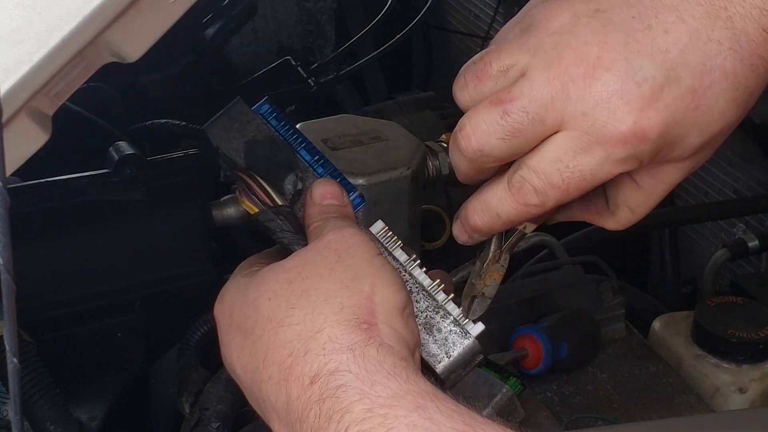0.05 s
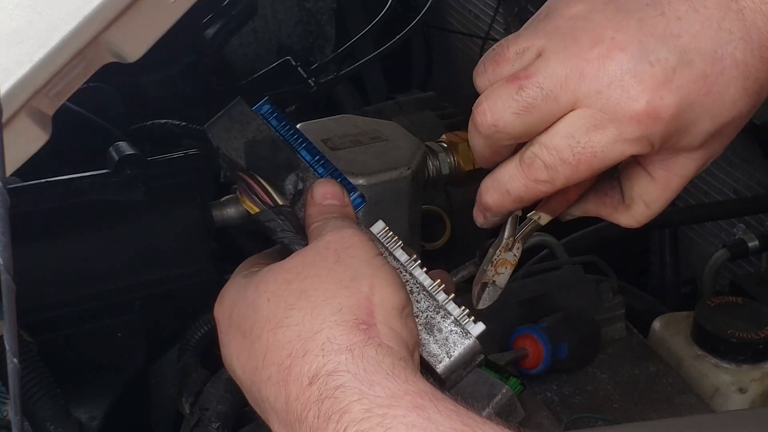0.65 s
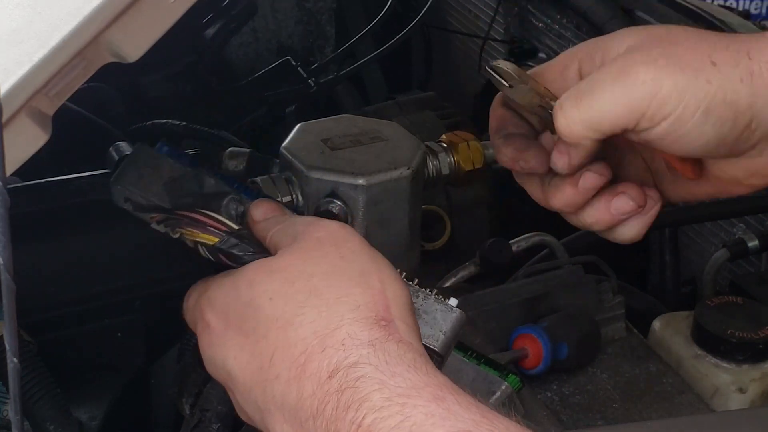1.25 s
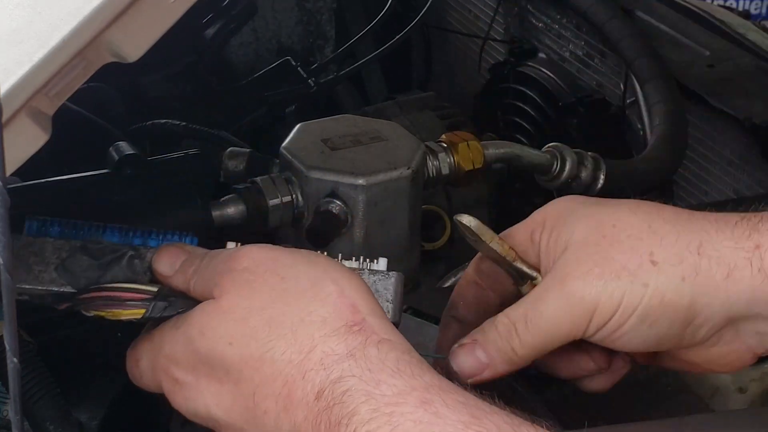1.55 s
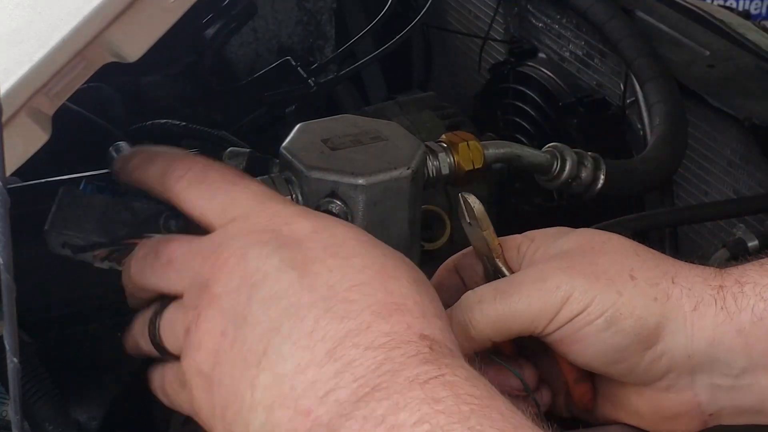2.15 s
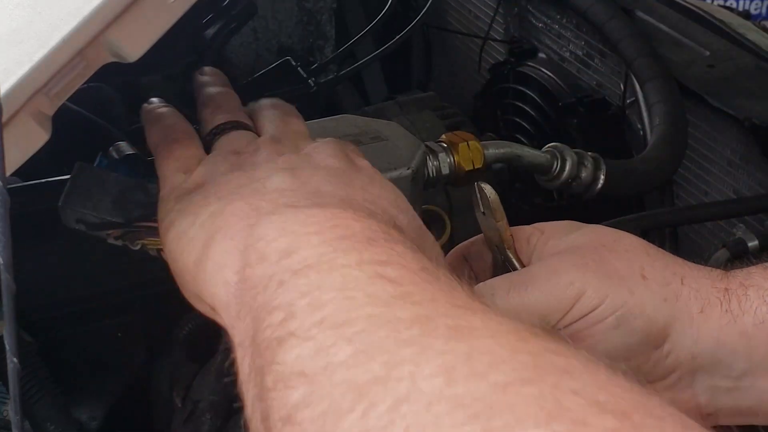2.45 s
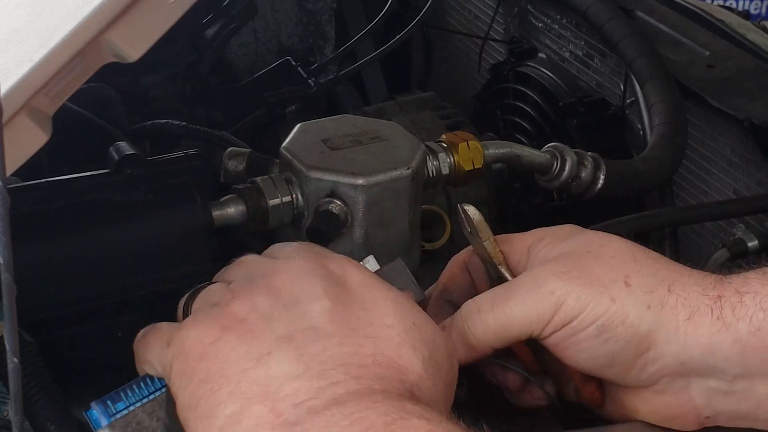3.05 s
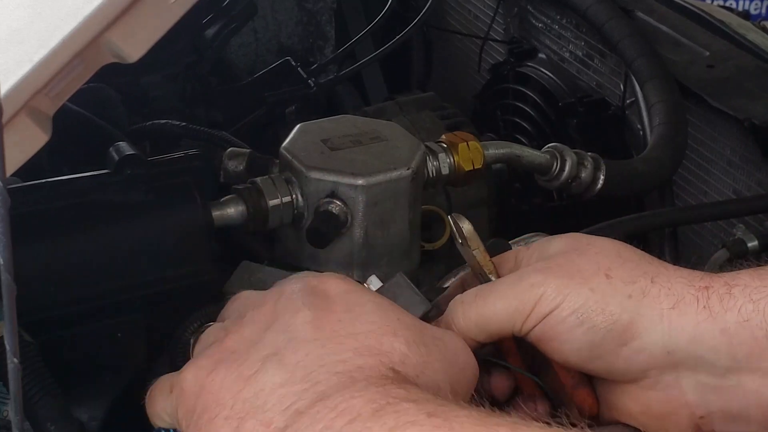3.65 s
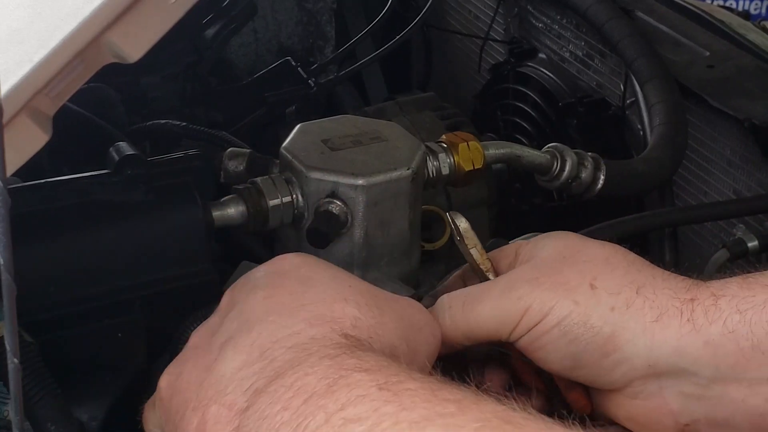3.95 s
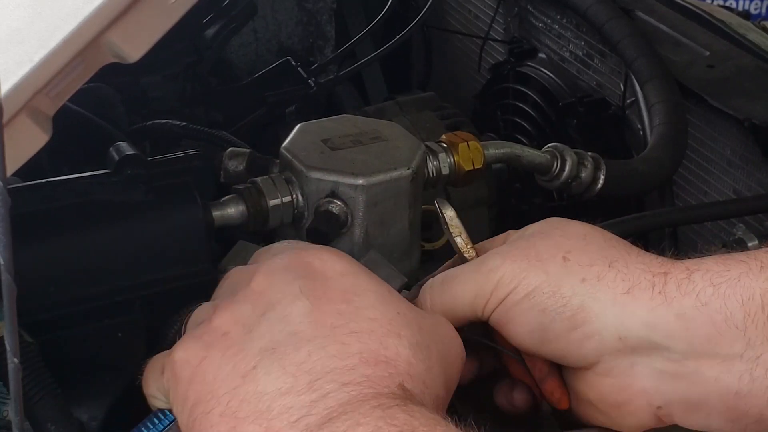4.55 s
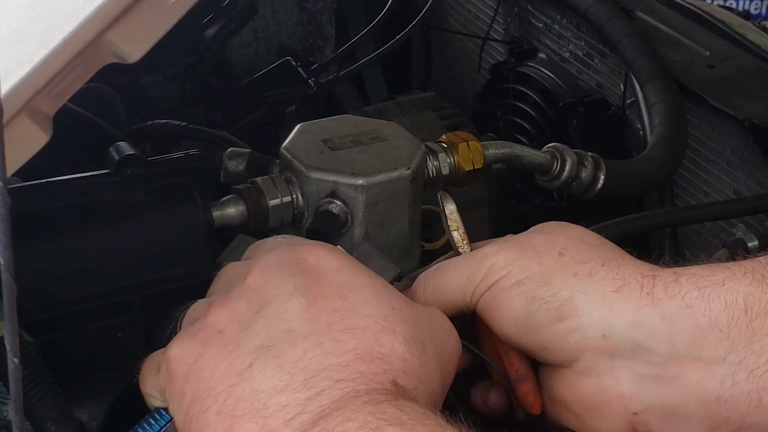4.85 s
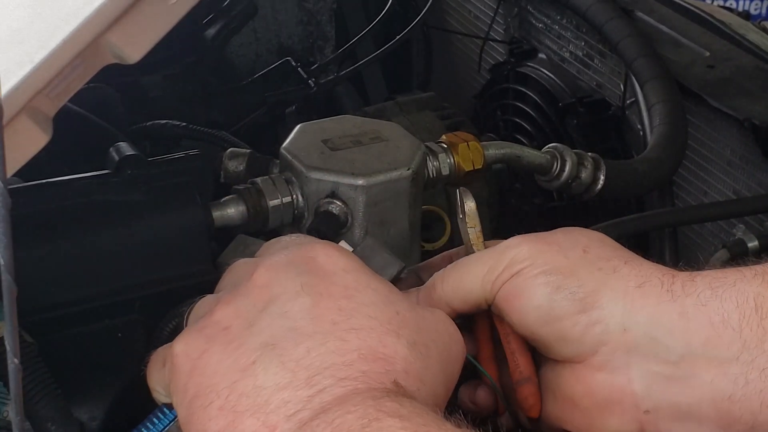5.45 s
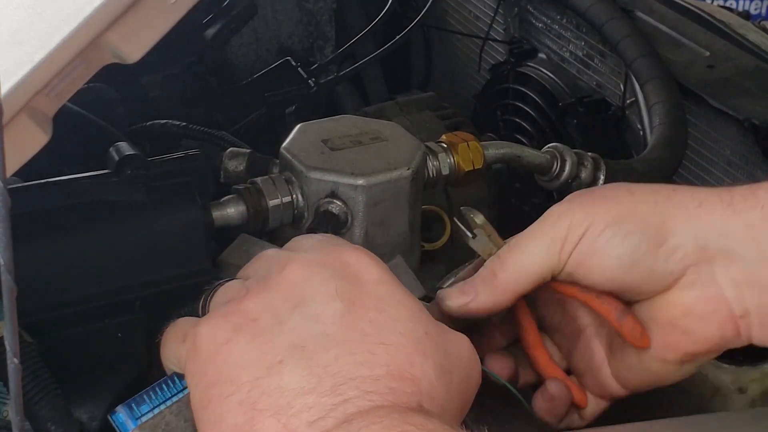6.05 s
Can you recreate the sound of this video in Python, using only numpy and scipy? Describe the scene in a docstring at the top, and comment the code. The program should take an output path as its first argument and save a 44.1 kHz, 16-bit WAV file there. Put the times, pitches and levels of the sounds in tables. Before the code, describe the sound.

In a quiet garage, a deep, steady drone builds while someone works a plastic connector into place with pliers. The steel tips tick and scrape lightly, the plastic shell clacks, and a bundle of wires bumps dully on a body panel. Low puffs of air buffet the nearby microphone, louder than the work itself. The clicks thin out, then return in a quick final cluster, mostly on the left.

```python
"""Pliers work a plastic wiring connector into place in a car's engine bay.
Their metal tips tick, ping and scrape, the plastic shell cracks and rings, and the bundle of wires
knocks against hollow bodywork. Faint squeaks, dull pops and a thin gliding hiss come in between.
A low drone swells in the garage, while a draught and sweeps of the arm push air at the microphone."""
import sys
import numpy as np
from scipy import signal
from scipy.fft import rfft, irfft, next_fast_len
from scipy.io import wavfile
from scipy.ndimage import uniform_filter1d

SR = 44100
rng = np.random.default_rng(int(sys.argv[2]) if len(sys.argv) > 2 else 0)


def to_wav(s):
    """Save 16-bit WAV."""
    ch = np.atleast_2d(s).T  # columns
    pcm = np.round(np.clip(ch, -1, 1) * 32767)  # PCM
    wavfile.write(sys.argv[1], SR, pcm.astype(np.int16))


N = 277389
TIME = np.arange(N) / SR
HIT_TIME = np.arange(SR // 2) / SR  # seconds since one hit began

# In all tables, ring_s is the time to fade by 60 dB and fall_s the time to drop to about a third.
# lean_db is how much louder the left side is than the right. A likeness of 1 means both sides match.

# tone of the garage's background noise: frequency_hz, level_db
ROOM_TONE = [(71, -32.5), (120, -1), (326, -13.5), (400, -12), (471, -20), (724, -21.5), (802, -22.5),
             (1160, -24.5), (1310, -23.5), (1540, -23), (1710, -25), (3080, -28), (7420, -39.5),
             (13100, -24.5), (15800, -26)]
# how alike that noise is on both sides: frequency_hz, likeness
ROOM_LIKENESS = [(130, 0.61), (300, 0.55), (640, 0), (1400, 0), (4000, 0.011)]
# how far it leans left: frequency_hz, lean_db
ROOM_BALANCE = [(100, 6.5), (300, 5.5), (2400, 3.5), (4400, 2.5), (15000, 0.7)]
# path of the low drone: time_s, pitch_hz, level_db
DRONE_PATH = [(0, 59.14, -70.5), (1.2, 59.9, -58), (1.5, 59.39, -42.5), (2.05, 57.5, -45.5),
              (2.5, 57.86, -40), (3.4, 60.15, -35.5), (5.3, 60.8, -34), (6.29, 62.8, -34.5)]
# tone of the rumble that goes with it: frequency_hz, level_db
RUMBLE_TONE = [(60, -0.5), (120, 4), (250, -2), (430, -16.5), (700, -33), (2000, -48.5)]
# draught on the microphone, stronger once the arm is close: time_s, level_db
DRAUGHT_LEVELS = [(0, -57.5), (1.1, -59.5), (1.5, -51.5), (3.3, -44.5), (6.29, -49.5)]
# arm sweeps that push air: peak_s, level_db, fall_s
ARM_SWEEPS = [(1.63, -39.5, .08), (1.8, -41, 0.045), (2.17, -31, 0.072), (2.48, -33, 0.056),
              (2.89, -36, 0.067), (3.04, -34, .07), (3.6, -45.5, 0.14), (4.14, -26, .055),
              (4.35, -28.5, 0.18), (4.85, -38.5, .12), (5.35, -33, 0.057), (5.49, -35.5, 0.075)]
# tone of gently swirling air: frequency_hz, level_db
SWIRL_TONE = [(10, -41), (25, -19), (45, 4.5), (70, 8.5), (110, 2), (170, -15.5), (260, -24), (450, -42),
              (1000, -62.5), (3000, -75)]
# higher tone of strongly churning air: frequency_hz, level_db
CHURN_TONE = [(50, -16.5), (140, 6), (220, -7.5), (400, -33.5), (900, -58), (3000, -72.5)]
# single puffs of air: peak_s, level_db, pitch_hz, lean_db
AIR_PUFFS = [(2.446, -13, 117, 43.5), (2.18, -19, 72, 24), (4.115, -15, 85.6, 44), (4.334, -28, 141, -7.5),
             (4.381, -19, 100, 42), (4.439, -19.5, 66.7, 0.5), (5.351, -26, 77.6, -6)]
# wires hitting the bodywork (harder hits reach higher): start_s, level_db, highest_hz, lowest_hz
WIRE_KNOCKS = [(0.461, -64, 472, 256), (1.331, -57.5, 284, 237), (1.857, -61.5, 320, 209),
               (1.974, -61.5, 350, 242), (2.332, -51, 418, 288), (2.680, -57.5, 295, 256),
               (2.734, -48, 397, 267), (2.762, -46.5, 1110, 230), (2.842, -52, 360, 260),
               (2.873, -43.5, 1260, 255), (2.88, -40.5, 754, 110), (2.99, -57.5, 774, 240),
               (3.182, -54, 430, 240), (3.334, -35, 2600, 233), (3.342, -41.5, 2700, 400),
               (3.346, -46.5, 920, 860), (3.674, -49.5, 421.6, 291), (3.714, -46.5, 292, 212),
               (4.162, -48.5, 1520, 500), (4.17, -47.5, 690, 520), (4.203, -59.5, 1290, 1150),
               (4.277, -43, 339, 139.6), (4.297, -54, 925, 430), (4.771, -46.5, 2107, 150),
               (4.776, -49, 676, 580), (5.583, -56, 340, 250), (6.026, -52, 457, 310),
               (6.140, -60, 450, 280)]
# notes of the body panel: pitch_hz, level_db, ring_s (before each hit stretches it)
PANEL_NOTES = [(235.9, 18, 0.2), (316, -9, 1), (406, -11.5, .15), (437, 2.5, .27), (522, -3.5, 0.031),
               (537, -4, 0.27), (593, -8, .2), (692, -7.5, 0.27), (715, -15.5, 0.068), (860, -8, 0.07),
               (914, -13.5, 0.074), (1050, -15.5, 0.13), (1040, -20.5, 0.087), (1248, -9, 0.17)]
# tone of the panel's crowded upper notes and the engine bay: frequency_hz, level_db
BAY_TONE = [(90, -17.5), (160, 9.5), (280, 8), (520, -3.5), (680, -9), (880, -7.5), (1500, -17.5),
            (2400, -18.5), (3000, -18.5), (3800, -31), (9000, -11.5), (16000, -36.5)]
# how long they last: frequency_hz, ring_s (before each hit stretches it)
BAY_RING_TIMES = [(200, 0.34), (900, 0.22), (2500, 0.22), (9000, 0.22)]
# air pockets behind the panel: pitch_hz, boost_db
AIR_POCKETS = [(165, 14), (275, 5), (470, 1.5), (600, 3), (870, 4)]
# light taps that set the pliers ringing: start_s, level_db
JAW_TAPS = [(0.4622, -63.5), (6.097, -76)]
# notes of the steel jaws: pitch_hz, level_db, ring_s (on the left side)
JAW_NOTES = [(3880, 2, 0.03), (3820, 5, 0.019), (4280, -5, 0.022), (5300, -15, 0.018), (2720, -8, 0.016)]
# plier tips touching the terminals: start_s, level_db, boost_below_7khz_db, highest_hz
TIP_TICKS = [(0.4625, -53, 2, 14100), (1.9853, -40.5, -4.5, 11800), (1.9918, -49, 3, 13000),
             (2.331, -58.5, 1, 10140), (2.7327, -47.5, -8, 14100), (2.7371, -44.5, -6, 11500),
             (2.755, -46.5, 1, 15000), (2.773, -49.5, 0, 14000), (2.826, -47.5, -26, 12100),
             (3.005, -63, -15, 13000), (3.180, -58.5, 0, 11200), (3.3357, -52, 10, 9700),
             (3.369, -60, 6, 10000), (4.164, -63.5, 9, 11700), (4.689, -59, -10, 13000),
             (4.771, -67, 12, 9860), (6.026, -59, 5, 10620), (6.0943, -39.5, -10.5, 10000)]
# tone of steel touching metal: frequency_hz, level_db
STEEL_TONE = [(400, -23), (1500, -15), (3000, -10), (4000, -12), (5500, -9), (7400, -18), (8800, -3),
              (10200, -0.5), (12000, -2), (16000, -7.5)]
# slides of metal and wire: peak_s, level_db, fall_s
METAL_SLIDES = [(0.478, -72, 0.023), (1.83, -70.5, 0.058), (1.987, -55, 0.038), (2.258, -71.5, 0.024),
                (2.760, -64, 0.12), (2.84, -68.5, 0.059), (3.025, -71, 0.037), (3.485, -56, 0.013),
                (4.165, -68, 0.062), (6.01, -69, 0.037), (6.092, -52.5, .014)]
# faint squeaks: start_s, length_s, top_pitch_hz, level_db
FAINT_SQUEAKS = [(1.76, 0.55, 9800, -83), (5.409, .15, 1204, -77.5), (5.52, .15, 8000, -93)]
# soft flicks close to the microphone: start_s, level_db, highest_hz, lean_db
SOFT_FLICKS = [(2.160, -45, 220, 12), (2.441, -40, 230, 22), (2.444, -56, 700, 22), (3.056, -44, 220, 10),
               (4.352, -43, 250, 10)]
# clacks of the plastic shell: start_s, level_db, crack_above_ring_db, pitch_hz
SHELL_CLACKS = [(2.332, -62.5, -8, 2384), (2.738, -57.5, -13, 2440), (2.761, -53.5, -7.5, 2520),
                (2.871, -73, 0, 2360), (3.181, -64, -7, 2460), (3.343, -52.5, 19, 2490),
                (3.674, -56, 12, 2230), (4.161, -68, 8, 2430), (4.769, -73.5, 11, 2350),
                (6.025, -50.5, 10, 2359), (6.032, -52, -5, 2420), (6.069, -62, 16, 2380),
                (6.094, -68, 11, 2300), (6.138, -72, 12, 2430)]
# notes of the shell, before each clack shifts and shortens them: pitch_hz, level_db, ring_s
SHELL_NOTES = [(1100, -16.5, 0.03), (1830, -20.5, 0.027), (2180, -16, 0.026), (2500, 5, 0.073),
               (2395, 8.5, 0.096), (2820, -12.5, 0.081), (4320, -5, 0.076)]
# tone of the shell's crack: frequency_hz, level_db
CRACK_TONE = [(300, -29.5), (700, -8), (1050, -1), (1500, -9), (2300, 4.5), (3000, -12.5), (3700, -22),
              (5000, -19), (7500, -28.5), (9500, -20), (16000, -36)]
# path of the thin hiss: time_s, pitch_hz, level_db
HISS_PATH = [(3.66, 9180, -85), (3.76, 9900, -85), (3.81, 10830, -72.5), (3.9, 11520, -76),
             (3.99, 11240, -79), (4.12, 11830, -86), (4.23, 10430, -73), (4.33, 9600, -85.5)]


def amp(db):
    """Turns decibels into a number to multiply by."""
    return 10 ** (np.asarray(db) / 20)


def unit(x):
    """Scales a sound to an average (rms) level of 1."""
    return x / np.sqrt(np.mean(x ** 2) + 1e-30)


def unit_start(x, samples):
    """Scales a sound so that its first samples on the left have an average level of 1."""
    return x / np.sqrt(np.mean(x[0, :samples] ** 2))


def read(table, hz):
    """Looks up a value between a table's rows, with frequency spaced in octaves."""
    row_hz, values = np.transpose(table)
    return np.interp(np.log(hz + 1), np.log(row_hz), values)


def follow(rows):
    """Joins timed rows into one curve for each column after the time."""
    times, *columns = np.transpose(rows)
    return [np.interp(TIME, times, column) for column in columns]


def swells(rows, rise_share):
    """Level of overlapping swells; each builds up in a share of its fall time."""
    levels = (amp(db) * np.exp(-np.maximum((peak_s - TIME) / rise_share, TIME - peak_s) / fall_s)
              for peak_s, db, fall_s in rows)
    return np.sqrt(sum(level ** 2 for level in levels))


def lean_left(sound, lean_db):
    """Turns the right side down by lean_db."""
    return sound * amp([[0], [-lean_db]])


def click_lean(db):
    """The louder a click, the further left it sits."""
    return 17.5 + 0.68 * (db + 58.5)


def add(mix, start_s, sound, lean_db):
    """Places a sound in the stereo mix."""
    part = mix[:, max(round(start_s * SR), 0):][:, :sound.shape[1]]
    part += lean_left(sound, lean_db)[:, :part.shape[1]]


def colour(x, db_at):
    """Shapes the tone by db_at(frequency), without smearing a hit backwards in time."""
    size = next_fast_len(x.shape[-1] + 4096)
    log_gain = np.log(amp(db_at(abs(np.fft.fftfreq(size, 1 / SR)))))
    response = np.exp(np.conj(signal.hilbert(log_gain)))
    return np.fft.ifft(np.fft.fft(x, size) * response).real[..., :x.shape[-1]]


def band(hz, low_hz, high_hz):
    """Gain in dB that keeps one band and cuts the rest by up to 50 dB."""
    return 10 * np.log10(1 / (1 + (hz / high_hz) ** 8 + (low_hz / (hz + 1)) ** 8) + 1e-5)


def noise_pair(likeness, size=len(HIT_TIME)):
    """White noise for left and right, one hit long unless a size is given."""
    left, other = rng.standard_normal((2, size))
    return np.array([left, likeness * left + np.sqrt(1 - likeness ** 2) * other])


def fade(ring_s):
    """A level that falls 60 dB in ring_s."""
    return np.exp(-np.log(1000) * HIT_TIME / ring_s)


def ring(notes, stretch, detune):
    """Fading notes; each hit lands somewhere else and wakes them a little differently."""
    chance = rng.standard_normal((len(notes), 3))
    out = np.zeros(len(HIT_TIME))
    for (hz, db, ring_s), (extra_db, shift, phase) in zip(notes, chance):
        wave = np.sin(2 * np.pi * hz * (1 + detune * shift) * HIT_TIME + np.pi * phase)
        out += amp(db + extra_db) * fade(ring_s * stretch) * wave
    return out


def garage(level_db=-71.5):
    """Steady room noise and microphone hiss."""
    hz = np.fft.rfftfreq(N, 1 / SR)
    left, other = rfft(rng.standard_normal((2, N)))
    likeness = read(ROOM_LIKENESS, hz)
    right = likeness * left + np.sqrt(1 - likeness ** 2) * other
    lean = amp(read(ROOM_BALANCE, hz) / 2)
    spectrum = np.array([left * lean, right / lean]) * amp(read(ROOM_TONE, hz))
    return amp(level_db) * unit(irfft(spectrum, N))


def drone(rumble_db=-27, right_phase_rad=0.1):
    """One deep tone, like a machine some way off, with a dull rumble that swells with it."""
    hz, db = follow(DRONE_PATH)
    tone = np.sqrt(2) * np.sin(2 * np.pi * np.cumsum(hz) / SR + np.array([[0], [right_phase_rad]]))
    rumble = unit(colour(noise_pair(0.8, N), lambda f: read(RUMBLE_TONE, f)))
    return lean_left((tone + amp(rumble_db) * rumble) * amp(db), lean_db=4)


def moving_air(churn_db=-13, puff_cycles=0.38):
    """Swirls of air press on the microphone; strong ones sound higher, and a few land as puffs."""
    strength = np.hypot(amp(follow(DRAUGHT_LEVELS)[0]), swells(ARM_SWEEPS, rise_share=0.9))
    swirls = unit(colour(noise_pair(0.25, N), lambda f: read(SWIRL_TONE, f)))
    churn = unit(colour(noise_pair(0.13, N), lambda f: read(CHURN_TONE, f)))
    churn *= amp(churn_db) * np.sqrt(strength / strength.max())
    out = lean_left(strength * (swirls + churn), lean_db=1.5)
    from_peak_s = HIT_TIME - HIT_TIME.mean()
    for peak_s, db, hz, lean_db in AIR_PUFFS:
        cycles = hz * from_peak_s
        bump = 1 / np.cosh(np.clip(np.pi / 2 * cycles / puff_cycles, -50, 50))
        puff = -np.cos(2 * np.pi * cycles) * bump
        add(out, peak_s + from_peak_s[0], amp(db) * puff[None], lean_db)
    return out


def bay_ring(stretch, shade_db_per_octave=6.15):
    """The panel and bay ring with so many notes that they blur into noise; low ones last longest."""
    hz, seconds, spectrum = signal.stft(noise_pair(0.55), SR, nperseg=256)
    ring_s = stretch * read(BAY_RING_TIMES, hz)[:, None]
    spectrum *= np.exp(-np.log(1000) * seconds / ring_s)
    spectrum[1] *= amp(-shade_db_per_octave * np.log2(1 + hz / 500))[:, None]  # the far side is duller
    blur = signal.istft(spectrum, SR, nperseg=256)[1][:, :len(HIT_TIME)]
    return colour(blur, lambda f: read(BAY_TONE, f))


def pocket_boost(hz, width_share=0.081):
    """Air pockets behind the panel add decibels near their own pitches."""
    return sum(db * np.exp(-((hz / pitch_hz - 1) / width_share) ** 2) for pitch_hz, db in AIR_POCKETS)


def wire_knocks(rise_s=0.00038, soft_hz=314, leak_db=-24):
    """The wires knock the hollow bodywork into ringing; soft hits are duller and last longer."""
    out = np.zeros((2, N))
    for start_s, db, high_hz, low_hz in WIRE_KNOCKS:
        stretch = 0.88 + 0.84 * (soft_hz / high_hz) ** 4
        bay = unit_start(bay_ring(stretch), 1200)
        panel = unit_start(ring(PANEL_NOTES, stretch, detune=0.0036)[None], 1200)
        knock = (bay + panel) * (1 - np.exp(-HIT_TIME / rise_s))
        leak = lambda f: leak_db - 20 * np.log10(1 + f / high_hz)  # a little sound outside the band
        knock = colour(knock, lambda f: np.maximum(band(f, low_hz, high_hz), leak(f)) + pocket_boost(f))
        add(out, start_s, amp(db) * unit_start(knock, 800), lean_db=4)
    return out


def jaw_pings():
    """The steel jaws ring briefly when they spring free."""
    out = np.zeros((2, N))
    for start_s, db in JAW_TAPS:
        left = ring(JAW_NOTES, stretch=1, detune=0.013)
        right = ring(JAW_NOTES, stretch=0.51, detune=0.0013)
        add(out, start_s, amp(db) * unit_start(np.array([left, right]), 200), lean_db=3)
    return out


def tip_ticks(snap_s=0.008, echo_s=0.11, echo_db=-13, tail_db=-25):
    """Metal tips snap, echo off the nearest parts, and leave a faint tail in the bay."""
    out = np.zeros((2, N))
    for start_s, db, boost_db, high_hz in TIP_TICKS:
        tone = lambda f: read(STEEL_TONE, f) + boost_db / (1 + (f / 7000) ** 6) + band(f, 1100, high_hz)
        snap = colour(noise_pair(0.19) * (fade(snap_s) + amp(echo_db) * fade(echo_s)), tone)
        tail = colour(noise_pair(0) * fade(echo_s), tone)
        add(out, start_s, amp(db) * unit_start(snap, 60), click_lean(db))
        add(out, start_s, amp(db + tail_db) * unit_start(tail, 400), lean_db=5)
    return out


def metal_scrapes(slips_per_s=2500, spread_db=-0.5):
    """Sliding metal and wire stick and slip, making tiny clicks over a smooth hiss."""
    pressure = swells(METAL_SLIDES, rise_share=0.72)
    slipping = rng.random(N) < slips_per_s / SR
    slip_sizes = amp(spread_db * np.minimum(rng.exponential(1, N), 3))
    grit = noise_pair(0.13, N) * (unit(slipping * slip_sizes) + 1)
    scrape = unit(colour(grit, lambda f: read(STEEL_TONE, f)))
    return lean_left(scrape * pressure, lean_db=7)


def shift_up(slow_noise, hz):
    """Moves slow, complex-valued noise up into a band of hiss around a changing pitch."""
    return unit((slow_noise * np.exp(2j * np.pi * np.cumsum(hz) / SR)).real)


def squeaks(sag_share=0.14, width_share=0.05):
    """Thin whistles whose pitch and level rise and fall in one arch."""
    out = np.zeros((2, N))
    for start_s, length_s, top_hz, db in FAINT_SQUEAKS:
        arch = np.sin(np.pi * np.arange(0, length_s, 1 / SR) / length_s)
        noise = noise_pair(0.5, len(arch)) + 1j * noise_pair(0.33, len(arch))
        slow_noise = signal.lfilter(*signal.butter(2, width_share * top_hz / SR), noise)
        whistle = shift_up(slow_noise, top_hz * (1 - sag_share * (1 - arch)))
        add(out, start_s, amp(db) * whistle * arch, lean_db=4)
    return out


def flicks(fade_s=0.069, low_hz=110):
    """Soft flicks near the microphone make short, dull pops with no echo."""
    out = np.zeros((2, N))
    for start_s, db, high_hz, lean_db in SOFT_FLICKS:
        muffle = signal.butter(4, [low_hz, high_hz], "bandpass", fs=SR, output="sos")
        pop = signal.sosfilt(muffle, noise_pair(0.24) * fade(fade_s))
        add(out, start_s, amp(db) * unit_start(pop, 900), lean_db)
    return out


def shell_clacks(rise_s=0.00089, crack_s=0.1, tail_s=0.27, tail_db=-16, base_pitch_hz=2432):
    """The plastic shell cracks and rings briefly; the grip shifts its pitch."""
    out = np.zeros((2, N))
    for start_s, db, crack_db, pitch_hz in SHELL_CLACKS:
        grit = noise_pair(0.15) * (fade(crack_s) + amp(tail_db) * fade(tail_s))
        crack = unit_start(colour(grit, lambda f: read(CRACK_TONE, f)), 400)
        gripped_notes = np.array(SHELL_NOTES) * [pitch_hz / base_pitch_hz, 1, 1]
        ringing = unit_start(ring(gripped_notes, stretch=0.58, detune=0.0024)[None], 400)
        clack = (amp(crack_db) * crack + ringing) * (1 - np.exp(-HIT_TIME / rise_s))
        add(out, start_s, amp(db) * unit_start(clack, 400), click_lean(db))
    return out


def gliding_hiss(width_hz=1500, waver_hz=240, flutter_db=2):
    """A thin, high hiss glides up and down while its pitch wavers and its level flutters."""
    hz, db = follow(HISS_PATH)
    wander = uniform_filter1d(rng.standard_normal((2, N)), size=500)
    waver, flutter = unit(uniform_filter1d(wander, size=300))
    noise = noise_pair(0.2, N) + 1j * noise_pair(0.2, N)
    slow_noise = signal.lfilter(*signal.butter(3, width_hz / SR), noise)
    hiss = shift_up(slow_noise, hz + waver_hz * waver)
    sounding = (TIME > HISS_PATH[0][0]) & (TIME < HISS_PATH[-1][0])
    return lean_left(hiss * amp(db + flutter_db * flutter) * sounding, lean_db=5)


def scene():
    """The sounds of the work, over the drone, the moving air and the room."""
    work = wire_knocks() + shell_clacks() + tip_ticks() + jaw_pings() + metal_scrapes()
    return work + gliding_hiss() + squeaks() + drone() + moving_air() + flicks() + garage()


def record(dry):
    """Cuts off the very highest treble."""
    treble_cut = signal.firwin(511, cutoff=15850, window=("kaiser", 9), fs=SR)
    return signal.oaconvolve(dry, treble_cut[None], "same")


dry = scene()
out = record(dry)
to_wav(out)
```